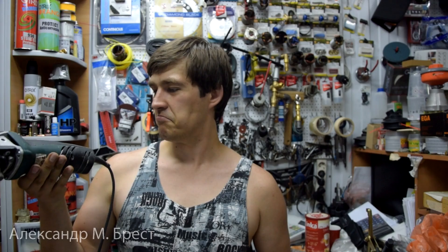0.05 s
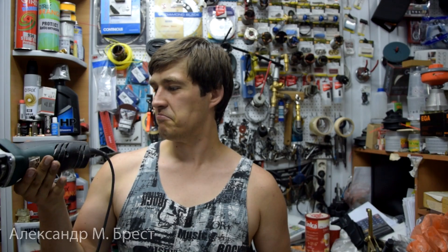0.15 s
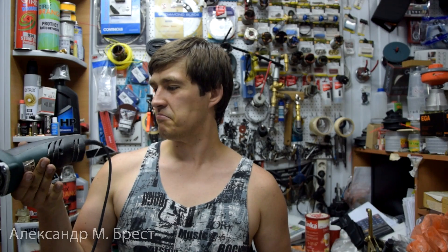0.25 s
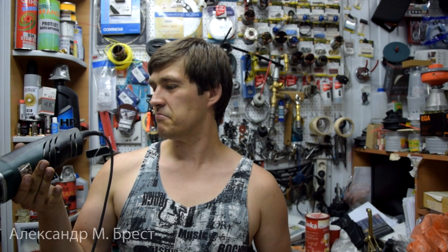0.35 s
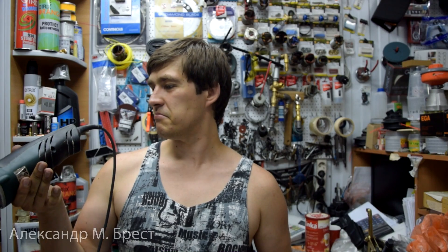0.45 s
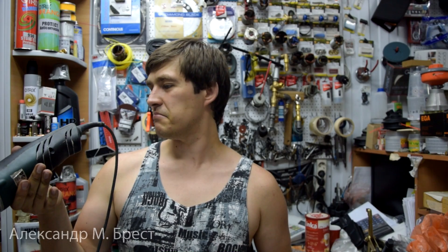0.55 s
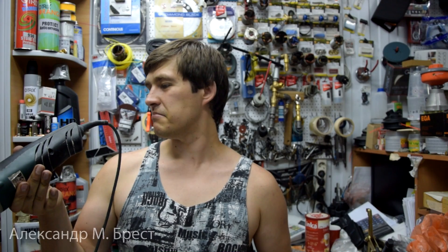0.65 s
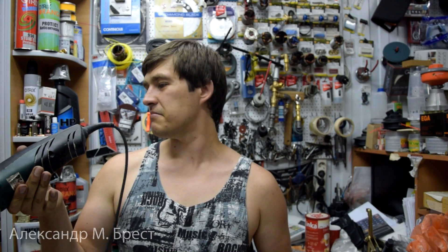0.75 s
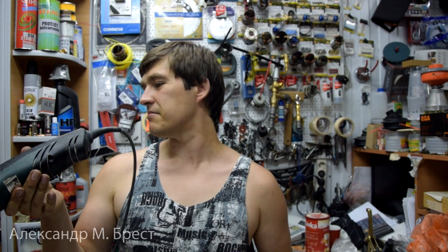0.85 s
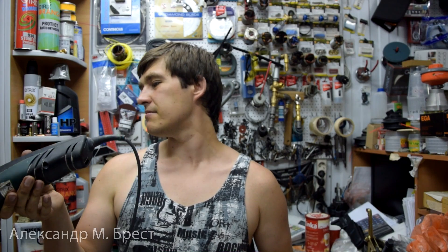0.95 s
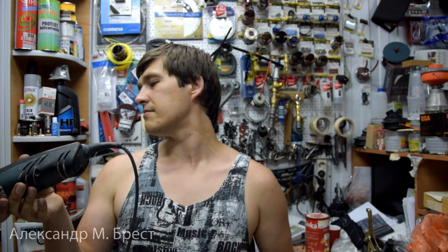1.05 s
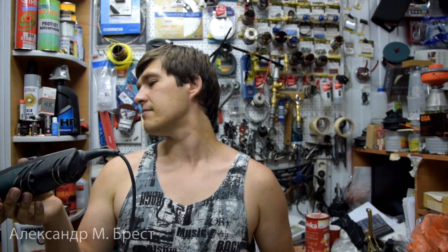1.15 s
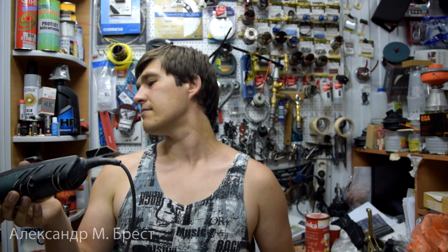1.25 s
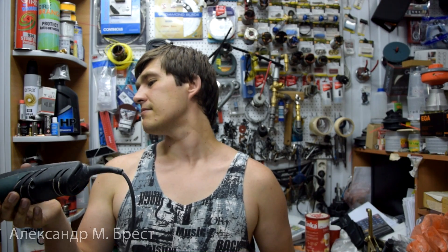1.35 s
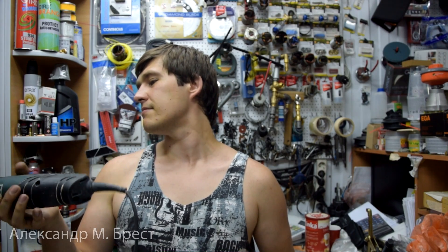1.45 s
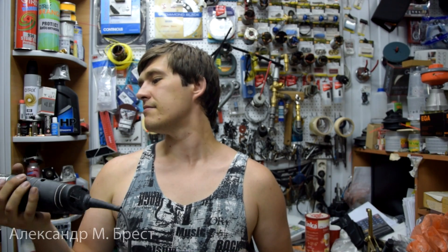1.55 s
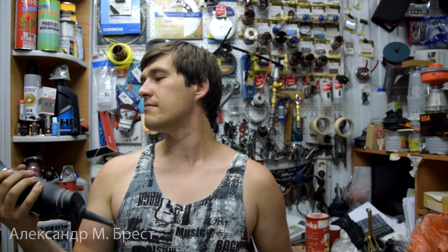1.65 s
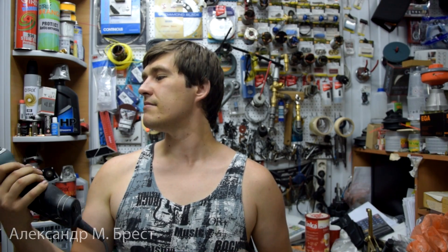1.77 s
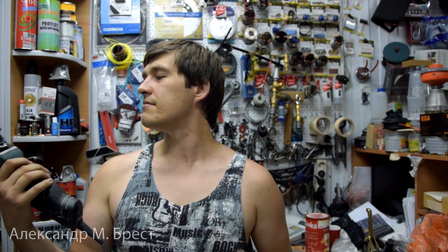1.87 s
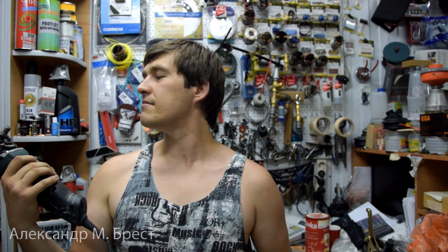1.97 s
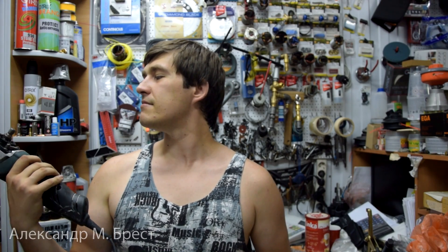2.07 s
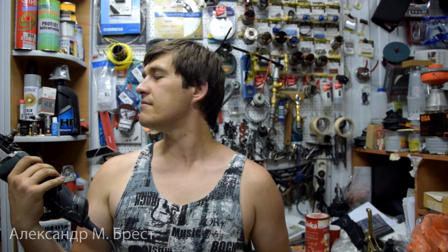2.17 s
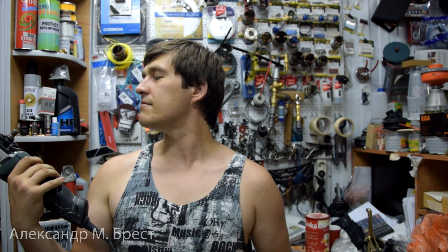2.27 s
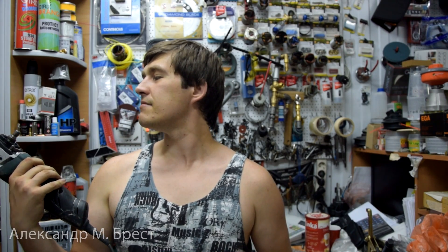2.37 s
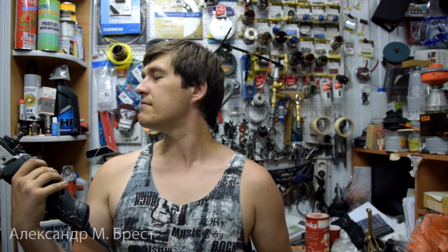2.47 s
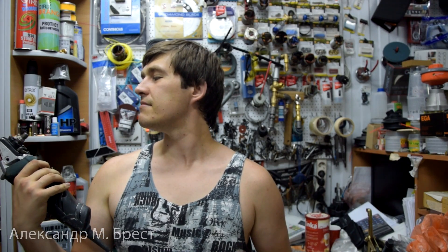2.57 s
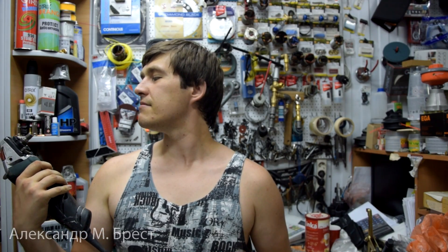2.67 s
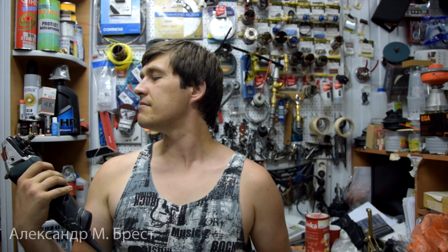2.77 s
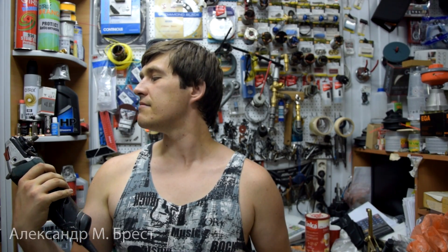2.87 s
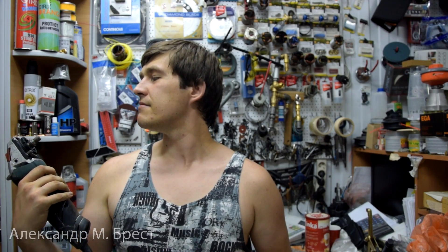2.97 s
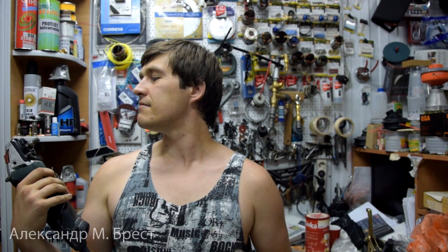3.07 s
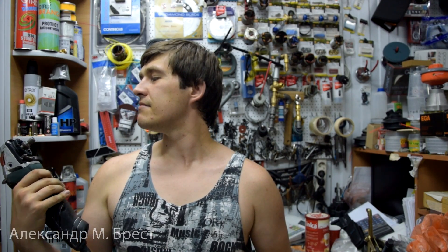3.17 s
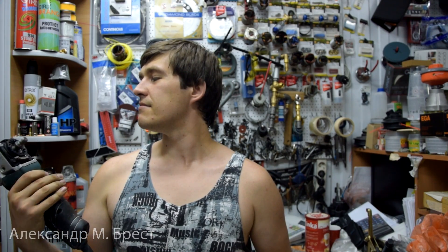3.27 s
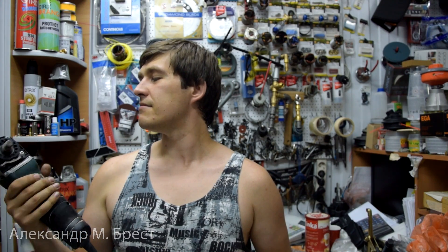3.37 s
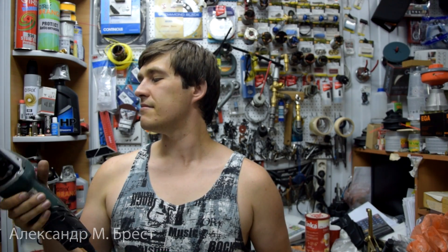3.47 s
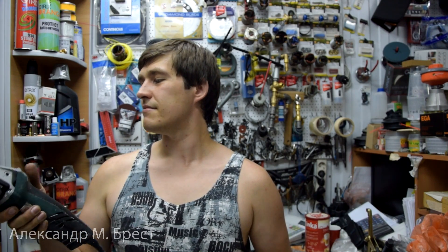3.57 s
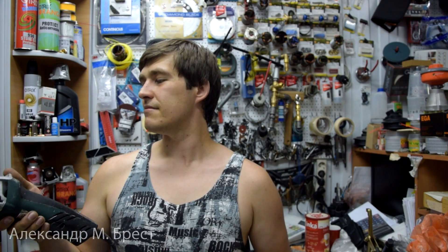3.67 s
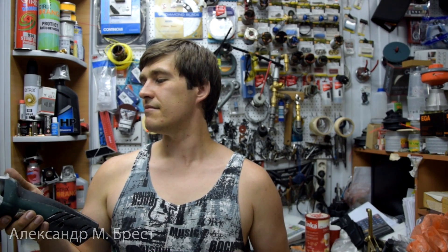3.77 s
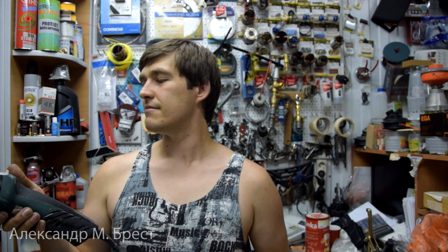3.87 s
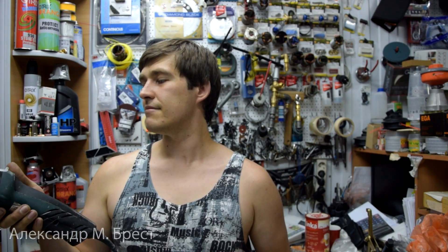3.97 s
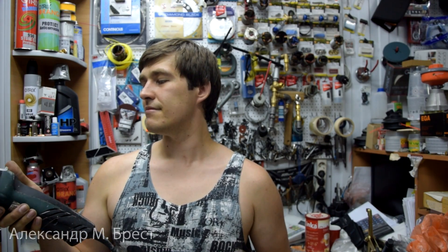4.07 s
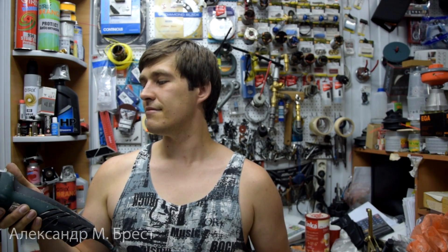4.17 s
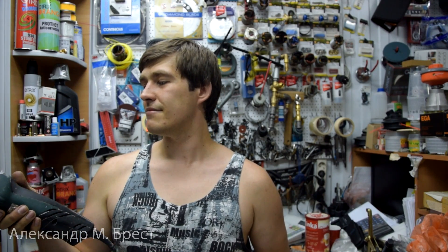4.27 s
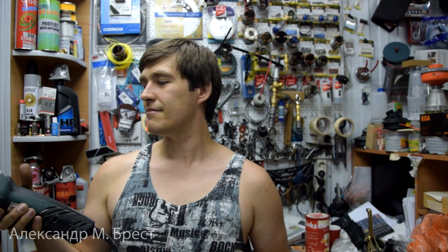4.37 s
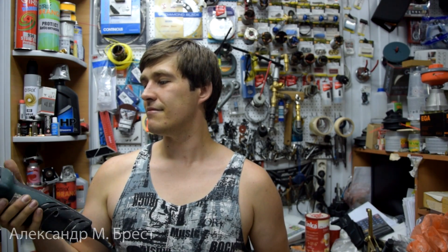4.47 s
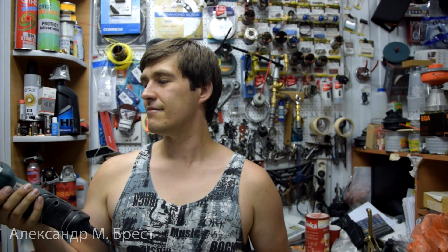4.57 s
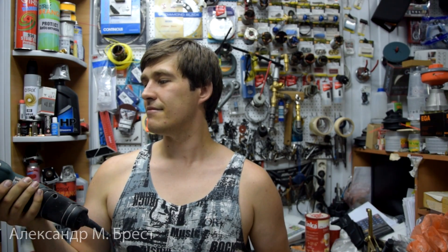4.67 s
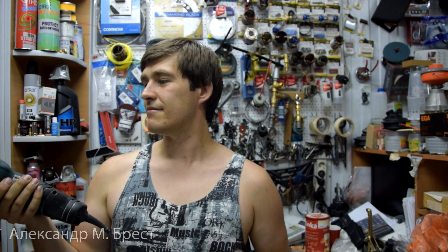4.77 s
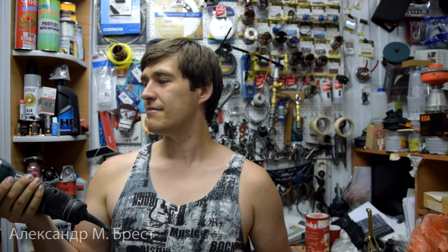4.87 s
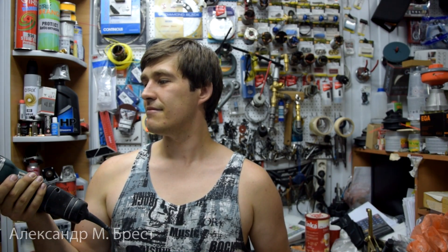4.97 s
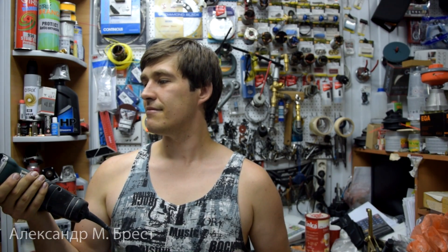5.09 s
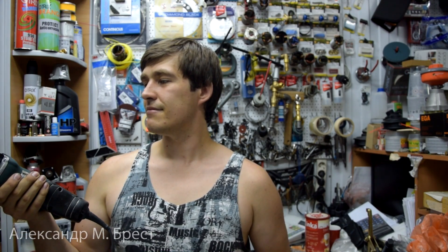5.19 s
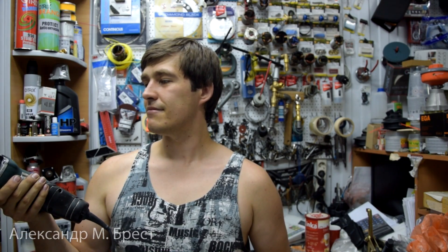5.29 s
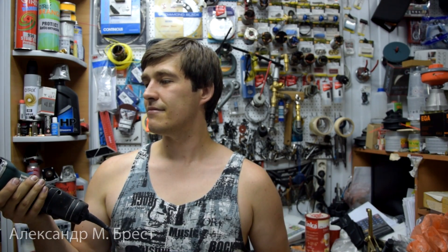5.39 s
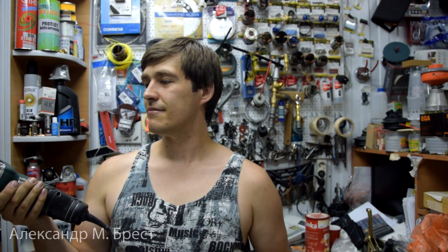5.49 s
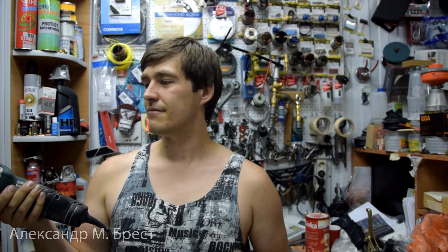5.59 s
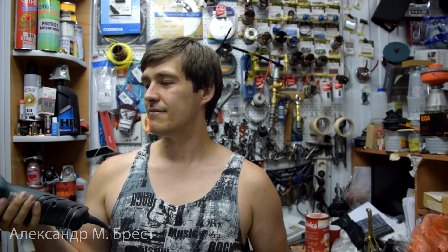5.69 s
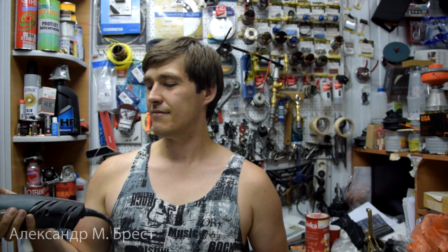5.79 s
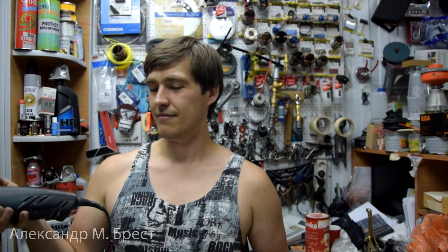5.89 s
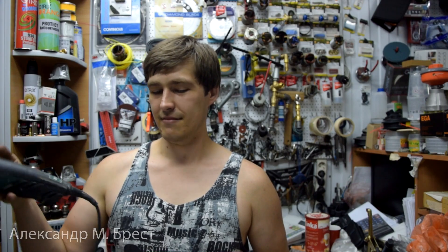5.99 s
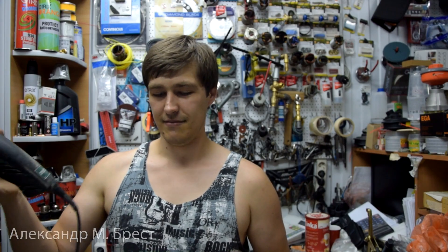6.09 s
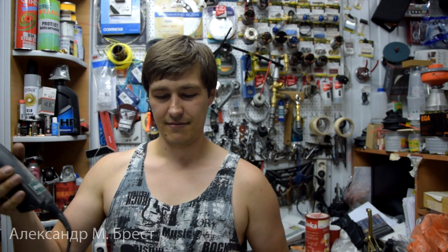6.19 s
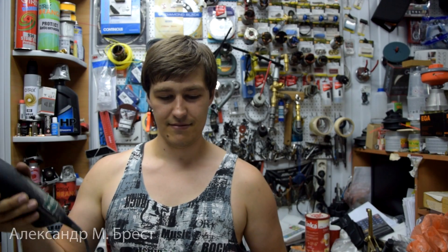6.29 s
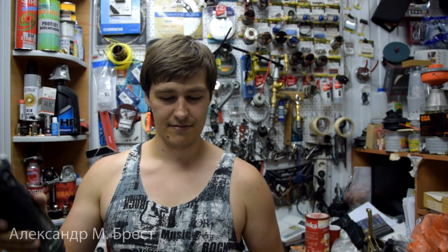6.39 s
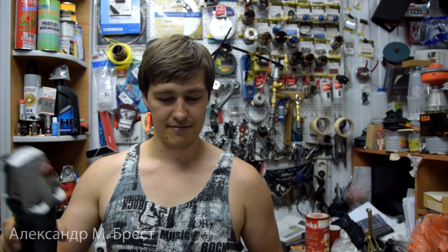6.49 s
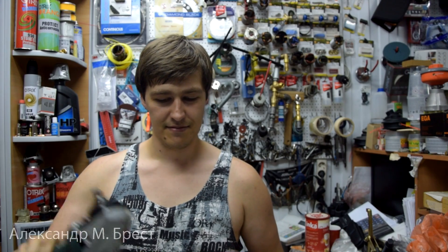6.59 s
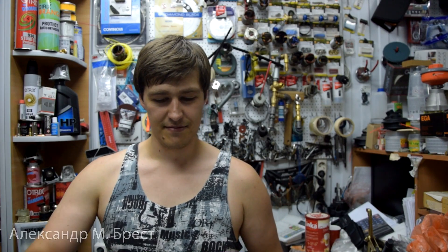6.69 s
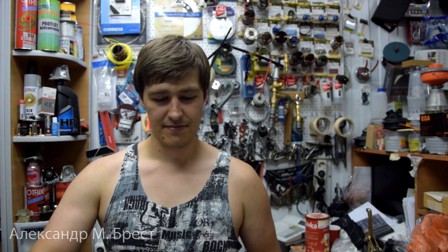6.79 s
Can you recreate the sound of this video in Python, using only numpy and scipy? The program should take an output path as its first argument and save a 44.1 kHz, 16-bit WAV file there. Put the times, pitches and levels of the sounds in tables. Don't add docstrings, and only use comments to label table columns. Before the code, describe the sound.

An angle grinder runs free in a small cluttered workshop, close to a stereo microphone. Bright, dense fan rush and airy vent whistles shift as the hand turns it, with low air gusts buffeting the microphone at the start. After about four seconds it is switched off; a clean high whine glides downward, the rush darkens and fades, and slack gears rattle.

```python
import sys
import numpy as np
from scipy import signal
from scipy.fft import rfft, irfft, next_fast_len
from scipy.io import wavfile
from scipy.ndimage import uniform_filter1d

SR = 44100
rng = np.random.default_rng(int(sys.argv[2]) if len(sys.argv) > 2 else 0)


def gain_from_db(level_db):
    decades = np.asarray(level_db, float) / 20
    return 10 ** decades


def wrap_up_sound(samples):
    columns = np.atleast_2d(samples).T
    tamed = np.clip(columns, -1, 1)
    steps = np.round(tamed * 32767).astype(np.int16)
    wavfile.write(sys.argv[1], SR, steps)


N = 301676
T = np.arange(N) / SR
SLOW = T[::64]
SIZE = next_fast_len(N + SR)
HZ = np.maximum(np.arange(SIZE // 2 + 1) * SR / SIZE, 1)
FULL_SPEED_HZ, OFF_S = 551, 4.323
# (time [s], loudness [dB], brightness [dB per octave])
FACING = [(0, 1, .5), (.6, .5, 0.1), (1.0, 0, -0.5), (1.3, -0.5, -.3), (1.56, -1, -0.55), (1.9, -0.5, 0.36),
          (2.5, -.5, 0), (3.3, 0, 0.34), (3.47, -0.5, -0.6), (3.62, 0, 0.1), (4.25, 0, 0.36),
          (4.6, -0.5, 0.45), (4.95, 0, .2), (5.3, -1, 0.2), (5.7, -1.5, 0.5), (6.1, -1, -0.8),
          (6.5, -.5, -0.3), (6.84, -0.3, -0.5)]


def columns(table):
    s, *values = np.transpose(table)
    return [np.interp(T, s, v) for v in values]


def along_hz(table):
    hz, value = np.transpose(table)
    return np.interp(np.log(HZ), np.log(hz), value)


def unit(x):
    return x / np.sqrt(np.mean(x ** 2))


def colour(x, gain):
    return irfft(rfft(x, SIZE) * gain, SIZE)[..., :N]


def mode(hz, width_hz):
    return 1j * HZ * width_hz / (hz ** 2 - HZ ** 2 + 1j * HZ * width_hz)


def walk(rate):
    k = int(SR / rate)
    held = np.repeat(rng.standard_normal(N // k + 1), k)
    return 0.86 * uniform_filter1d(uniform_filter1d(held, k), k)[:N]


def shop():
    # (frequency [Hz], density [dB per Hz])
    rumble = [(12, -42), (35, -2), (102, -4), (150, -7.5), (344, -7), (400, -6), (520, -30), (880, -120)]
    level_db = -76
    return gain_from_db(level_db) * unit(colour(rng.standard_normal((2, N)), gain_from_db(along_hz(rumble))))


def jet():
    # (frequency [Hz], width [Hz])
    eddies = [(48, 23), (115, 65)]
    # (frequency [Hz], width [Hz])
    wake_eddy = (28, 20)
    # (time [s], level [dB], small eddies over it [dB], left minus right [dB])
    gusts = [(.145, -45, -4, -9), (.172, -28.5, -10, 11), (.2, -27, 1.5, -6), (.232, -23.5, -18, -7),
             (.262, -29.5, -6, 10), (.3, -38, -10, 4), (.342, -32, -2, 14.5), (.38, -31, -18, 5),
             (.43, -37, -14, 14), (.485, -34.5, -24, 13), (.585, -42, -14, -2), (.64, -49, -20, -10),
             (.71, -56, -14, 4), (.82, -48, -18, -3), (.925, -45, -20, 7), (.975, -45, -10, -8),
             (1.05, -57, -10, -3), (1.13, -61, -14, 12), (1.3, -78, -8, 0), (1.69, -72, -8, -5)]
    rise_s, fall_s = 0.015, 0.02
    wake_db, wake_fall_db_s = -45, 18

    large, small, swirl = (colour(rng.standard_normal((2, N)), mode(hz, width) ** 2)
                           for hz, width in [*eddies, wake_eddy])
    large, small = (e / np.sqrt(uniform_filter1d(e ** 2, SR // 20)) for e in (large, small))

    power = np.zeros((2, 2, len(SLOW)))
    for s, level_db, small_db, pan_db in gusts:
        swell = -((SLOW - s) / rise_s) ** 2
        fade = (s - SLOW) / fall_s
        shape = np.exp(np.where(SLOW < s, swell, fade))
        size_and_port_db = np.add.outer([0, 2 * small_db], [pan_db, -pan_db])
        power += np.multiply.outer(gain_from_db(2 * level_db + size_and_port_db), shape ** 2)
    large_level, small_level = ([np.interp(T, SLOW, np.sqrt(port)) for port in size] for size in power)

    since = T - gusts[1][0]
    wake_gate = (since > 0) * np.clip((2.1 - T) / .2, 0, 1)
    wake = wake_gate * gain_from_db(wake_db - wake_fall_db_s * since + 3.0 * walk(10))
    return large_level * large + small_level * small + wake * unit(swirl)


def echoes(x):
    turn_s, t60_s = .1, 0.21
    hop, length = int(turn_s * SR), int(t60_s * SR)
    fade = np.sin(np.pi * np.arange(2 * hop) / (2 * hop))
    padded, out = np.pad(x, (hop, 2 * hop)), np.zeros((2, N + 4 * hop + SR))
    for start in range(0, N + hop, hop):
        tail = rng.standard_normal((2, length)) * gain_from_db(-60 * T[:length] / t60_s)
        tail = tail / np.sqrt(np.sum(tail ** 2, axis=1, keepdims=True))
        piece = signal.fftconvolve([fade * padded[start:start + 2 * hop]], tail, axes=1)
        out[:, start:start + piece.shape[1]] += piece
    return out[:, hop:hop + N]


def ports(x):
    # (frequency [Hz], likeness of the ports [0-1])
    likeness = [(100, 0.76), (300, 0.88), (700, 0.9), (2000, 0.83), (4000, 0.72), (6000, 0.97),
                (7300, 0.34), (9000, 0.74), (10500, 0.58), (13500, 0.47), (16000, .45)]
    # (frequency [Hz], left minus right [dB])
    left_db = [(100, -2), (300, 5), (700, 2), (2000, 2), (4500, 2.5), (6700, 8), (8200, -2), (9800, 0),
               (11300, -0.5), (13800, 5.5), (15700, 3)]
    # (frequency [Hz], lead of the left port [radians])
    lead = [(100, 0), (1000, -.1), (4000, -.2), (6000, -.3), (8200, -1.2), (10500, -.35), (12400, -.3),
            (14500, -1.5), (15700, -2)]
    alike = np.clip(along_hz(likeness), 0, 1)
    side = np.array([[.5], [-.5]])
    balance = gain_from_db(side * along_hz(left_db))
    direct = colour(x, balance * np.sqrt(alike) * np.exp(1j * side * along_hz(lead)))
    return direct + colour(echoes(x), balance * np.sqrt(1 - alike))


def speed():
    # (constant [Hz/s], per Hz [1/s], per Hz squared [1])
    drag = (41.34, .2339, .0004144)
    hz = np.linspace(FULL_SPEED_HZ, 100, 3000)
    seconds = np.cumsum((hz[0] - hz[1]) / np.polyval(drag[::-1], hz))
    return np.interp(T, OFF_S + seconds, hz)


def rattle(shaft_hz):
    # (frequency [Hz], width [Hz], level [dB])
    head_modes = [(1300, 700, -18), (3000, 900, -14), (4400, 560, 0), (5300, 1100, -15)]
    # (time [s], peak [dB])
    hard_knocks = [(5.6223, -30), (5.6981, -33), (5.74, -30), (5.7904, -33), (5.8128, -31), (5.8857, -33),
                   (5.9144, -29), (5.9535, -31), (5.979, -24), (6.0144, -30), (6.0249, -31), (6.0323, -31),
                   (6.0643, -28), (6.1132, -23), (6.1611, -32), (6.175, -25), (6.2094, -33), (6.2429, -34),
                   (6.263, -27), (6.3114, -37), (6.324, -28), (6.3307, -23), (6.3578, -25), (6.407, -36),
                   (6.4195, -32), (6.5118, -32), (6.5708, -39), (6.6021, -39), (6.642, -37), (6.8011, -35)]
    run_db, coast_db, slack_s = -60, -45, 1.5
    jolt_db, jolt_s = -38, 0.12
    settle_s, settle_db_s = 6.2, 5
    uneven_db, knocks_per_turn = 3.5, 2.5

    slack = np.clip((T - OFF_S) / slack_s, 0, 1)
    loose_db = run_db + slack * (coast_db - run_db + 3.1 * walk(12))
    settling_db = settle_db_s * np.maximum(T - settle_s, 0)
    jolt = gain_from_db(jolt_db) * np.exp(-np.abs(T - OFF_S) / jolt_s)
    level = gain_from_db(loose_db - settling_db) + jolt

    hit, size, sign = rng.random((3, N))
    strength = gain_from_db(-uneven_db * np.log(size + 1e-9)) * np.sign(sign - .5)
    knocks = np.clip((hit < knocks_per_turn * shaft_hz / SR) * strength, -5, 5)
    knocks = knocks / np.sqrt(uniform_filter1d(knocks ** 2, SR // 4))

    head = sum((-1) ** k * gain_from_db(db) * mode(hz, width) ** 2
               for k, (hz, width, db) in enumerate(head_modes))
    hard = np.zeros(N)
    s, peak_db = np.transpose(hard_knocks)
    hard[(s * SR).astype(int)] = gain_from_db(peak_db + 26.5)
    return level * unit(colour(knocks, head)) + colour(hard, head)


def whine(shaft_hz, slowing_db):
    orders = (31, 1, 12, 24, 36)
    # (level at full speed [dB], loudness as a power of speed [1])
    tones = [(-42.5, 1.02), (-71.5, 1.8), (-56, 1.1), (-62, -0.9), (-74.5, -0.9)]
    # (frequency [Hz], width [Hz], lift [dB])
    housing = [(342, 105, 14.5), (2000, 250, 7), (3200, 500, 7), (3780, 600, 3.5), (4300, 350, -6),
               (5170, 540, 3), (5750, 270, -2), (6270, 430, 4), (6950, 540, 4), (7500, 430, 3.5),
               (10000, 450, 1), (10950, 1900, 9.5), (12400, 700, 9), (14800, 3600, 6)]
    free = np.clip((T - OFF_S) / .12, 0, 1)
    turns, out = np.cumsum(shaft_hz) / SR, 0
    for order, (db, power) in zip(orders, tones):
        lift_db = sum(top_db / (1 + (2 * (order * shaft_hz - hz) / width) ** 4)
                      for hz, width, top_db in housing)
        level = gain_from_db(db + power * slowing_db + lift_db + 3.2 * walk(45))
        out = out + level * np.sin(2 * np.pi * order * turns)
    return free * np.sqrt(2) * out


def singing(away_db, modes, share_db):
    # (middle [s], length [s], opening [Hz], level [dB])
    swings = [(0.067, 0.24, 10000, -27), (.5, .5, 10000, -28), (1.5, .15, 10000, -33),
              (3.4, .2, 10000, -28), (4.16, 1, 10000, -30), (0.74, .2, 11350, -29), (2.4, 0.7, 11350, -32),
              (3.58, .1, 11350, -27), (4, 0.76, 11350, -34.5), (0.77, .8, 13050, -28),
              (1.3, 0.43, 13050, -31), (2.8, .9, 10000, -34), (3.58, .12, 13050, -27),
              (4.4, 0.47, 13050, -30), (0.51, 0.79, 4450, -32), (2.25, 2, 4450, -31.5),
              (3.83, 0.95, 4450, -30.5), (4.24, .2, 4450, -32), (1.77, 0.18, 910, -41),
              (4.8, 3.2, 910, -43), (5.79, 1.3, 910, -39), (0.27, 0.74, 1230, -41), (1.1, 0.7, 1230, -43),
              (1.7, 0.14, 1230, -48), (6.27, 1, 1230, -38.5), (0.16, .3, 1430, -41), (1.74, .2, 1430, -38),
              (2.76, .2, 1430, -39), (4.2, 2, 1430, -38.5), (5.2, 1.45, 1430, -36)]
    out = 0
    for db, (hz, width) in zip(away_db, modes):
        power = np.full(len(SLOW), gain_from_db(2 * db))
        for s, length, at_hz, top_db in swings:
            if abs(np.log(at_hz / hz)) < .06:
                swing = np.cos(np.pi * np.clip((SLOW - s) / length / 1.33, -.5, .5)) ** 2
                power += gain_from_db(2 * top_db) * swing
        level = np.interp(T, SLOW, np.sqrt(power)) * gain_from_db(share_db + 1.0 * walk(12))
        out = out + level * unit(colour(rng.standard_normal(N), mode(hz, width) ** 2))
    return out


def vents(slowing_db):
    # (frequency [Hz], width [Hz])
    vent_modes = [(9930, 1060), (11450, 500), (13050, 650), (4460, 280)]
    duct_modes = [(680, 150), (910, 245), (1230, 150), (1400, 230)]
    vent_away_db = (-35.5, -48, -40, -47)
    duct_away_db = (-49, -44.5, -68, -47)
    duct_power = 1.25
    draught = gain_from_db(-40 * np.maximum(T - 4.45, 0))
    whistles = draught * singing(vent_away_db, vent_modes, share_db=-4.5)
    return whistles + gain_from_db(duct_power * slowing_db) * singing(duct_away_db, duct_modes, share_db=-2.5)


def rush(slowing_db):
    # (frequency [Hz], density [dB per Hz])
    fan = [(35, -69), (60, -40), (167, -33), (306, -22.5), (369, -24), (425, -16.5), (524, -18),
           (959, -8.5), (1760, -6.5), (2220, -4.5), (2440, -6), (4360, -1.5), (7450, -7.5), (11600, -3.5),
           (15700, -11.5)]
    # (frequency [Hz], loudness as a power of speed [1])
    speed_power = [(100, 1.8), (650, 1.7), (2200, 2.25), (5500, 2.24), (10500, 2.43), (15000, 4.5)]
    rush_db = -30.5
    air = rfft(rng.standard_normal(N), SIZE) * gain_from_db(along_hz(fan))
    air /= np.std(irfft(air * ((HZ > 4800) & (HZ < 6800)), SIZE)[:N])
    power, out = along_hz(speed_power), 0
    level_db, tilt_db = columns(FACING)
    for centre in 2 ** np.arange(5, 14.6, .5):
        share = np.cos(np.pi * np.clip(np.log2(HZ / centre), -.5, .5)) ** 2
        db = np.interp(centre, HZ, power) * slowing_db
        db = db + tilt_db * np.log2(max(centre, 400) / 4000)
        db = db + 0.6 * walk(9) + 0.78 * walk(1.96)
        out = out + gain_from_db(db) * irfft(air * share, SIZE)[:N]
    return gain_from_db(rush_db) * out


def scene():
    shaft_hz = speed()
    slowing_db = 20 * np.log10(shaft_hz / FULL_SPEED_HZ)
    air = gain_from_db(columns(FACING)[0]) * (rush(slowing_db) + vents(slowing_db))
    tool = air + whine(shaft_hz, slowing_db) + rattle(shaft_hz)
    return ports(tool) + jet() + shop()


def band_limit(x):
    return signal.sosfilt(signal.butter(12, 16000, fs=SR, output="sos"), x)


def record(dry):
    top_hz = 15730
    mix = colour(dry, HZ < top_hz)
    return band_limit(mix)


dry = scene()
out = record(dry)
wrap_up_sound(out)
```